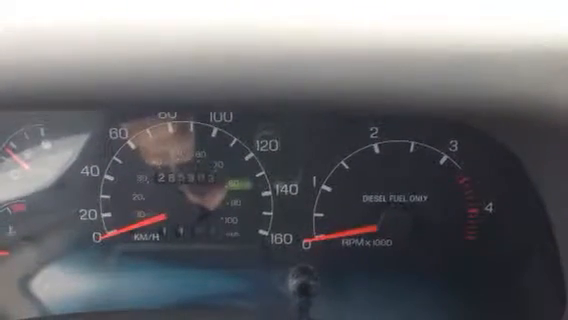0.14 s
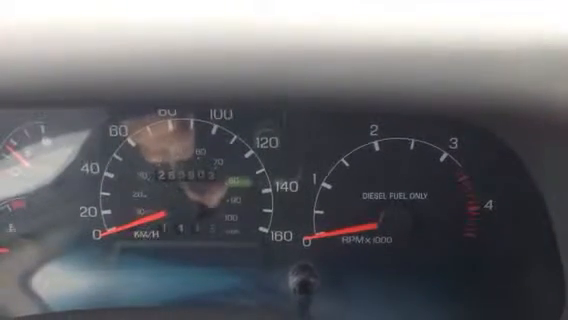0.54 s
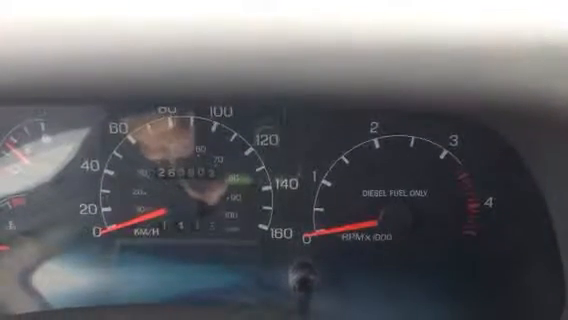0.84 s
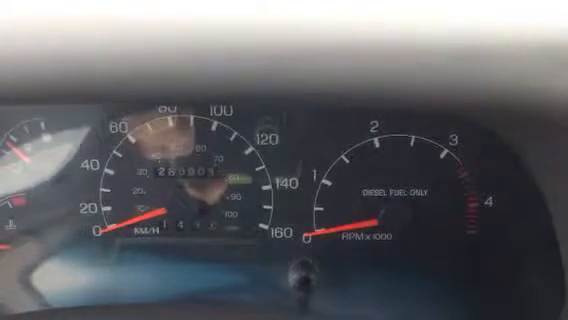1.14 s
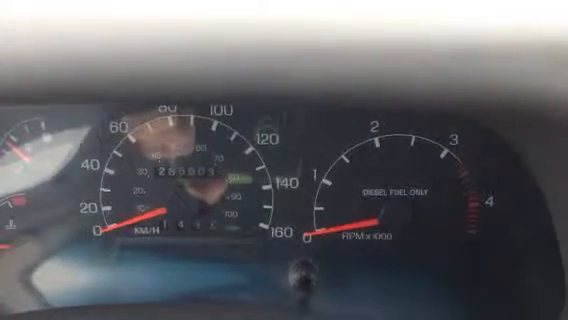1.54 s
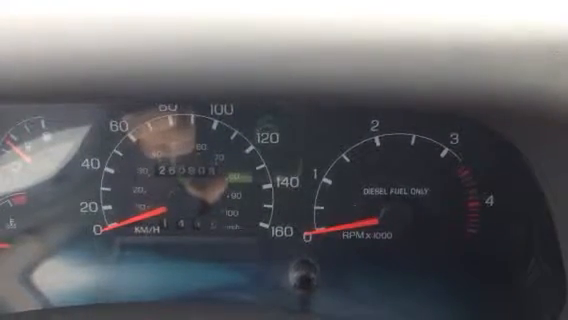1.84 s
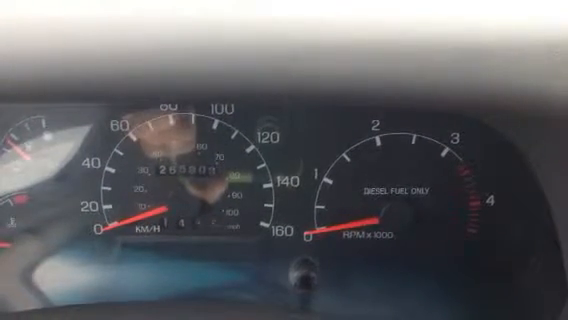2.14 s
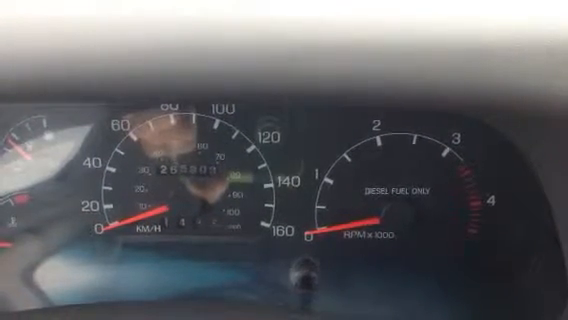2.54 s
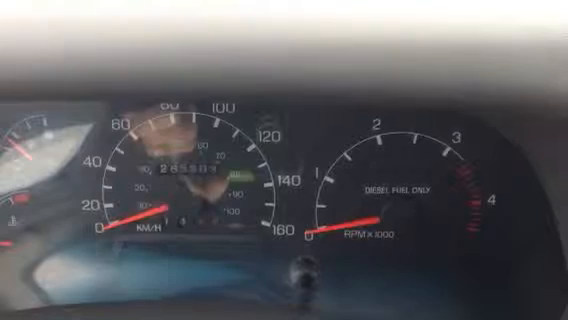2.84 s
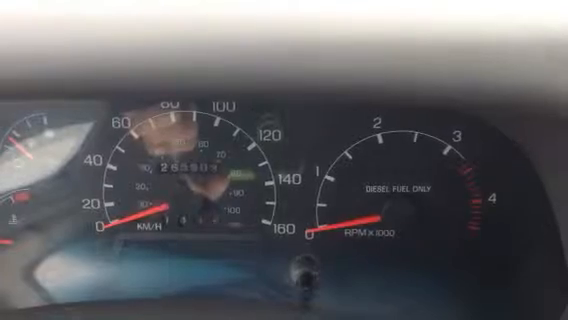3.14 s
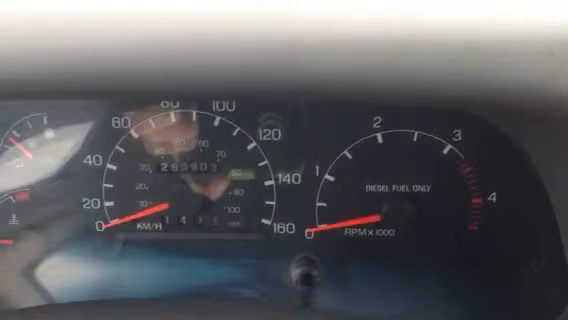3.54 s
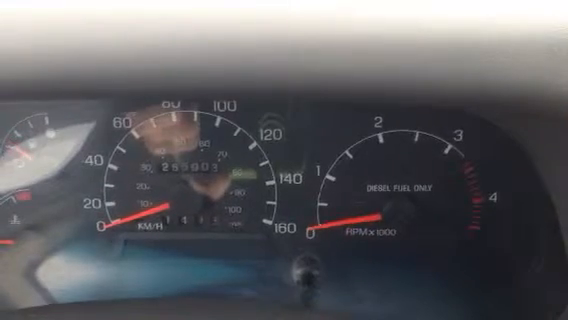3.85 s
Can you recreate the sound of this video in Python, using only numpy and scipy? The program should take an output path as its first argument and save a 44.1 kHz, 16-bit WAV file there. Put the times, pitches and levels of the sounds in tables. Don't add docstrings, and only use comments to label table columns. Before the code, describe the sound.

Starter motor of a parked diesel clunks in and grinds after sparse sharp ignition switch clicks.

```python
import sys
import numpy as np
from scipy import signal
from scipy.fft import rfft, irfft
from scipy.io import wavfile
from scipy.ndimage import uniform_filter1d

SR = 44100
rng = np.random.default_rng(int(sys.argv[2]) if len(sys.argv) > 2 else 0)


def nominal_scale(level):
    x = np.asarray(level, float) / 20
    return 10 ** x


def dump_mix(stems):
    frames = np.atleast_2d(stems).T
    limited = np.clip(frames, -1, 1)
    pcm = np.round(limited * 32767).astype(np.int16)
    wavfile.write(sys.argv[1], SR, pcm)


N = 176400


def colour(points, size=N):
    hz, db = np.array(points, float).T
    log_f = np.log(np.arange(size // 2 + 1) * SR / size + 1)
    gain = nominal_scale(np.interp(log_f, np.log(hz), db, left=-90))
    x = irfft(rfft(rng.standard_normal(size)) * gain, size)
    return x / x.std()


def ring(x, body):
    return sum(nominal_scale(db) * signal.lfilter(*signal.iirpeak(hz, hz / width, SR), x) for hz, width, db in body)


def walk(rate, size=N):
    k = int(SR / rate)
    x = np.repeat(rng.standard_normal(size // k + 1), k)
    x = uniform_filter1d(uniform_filter1d(x, k), k)[:size]
    return x / x.std()


def pushes(rows):
    width_s = 0.00059
    t = np.arange(N) / SR
    return sum(nominal_scale(db) * np.exp(-((t - s) / width_s) ** 2) for s, db in rows)


def contact(hits, body, tone, broad_db, grit_db, wet_db):
    cabin_t60_s, mode_grit, wander = .08, .55, .42
    first, size = int((hits[0][0] - .04) * SR), 20480
    t = (first + np.arange(size)) / SR
    env = 0
    for s, db, rise, t60 in hits:
        env = env + nominal_scale(db) * np.exp(np.where(t < s, (t - s) / rise, np.log(1000) * (s - t) / t60))

    modes = 0
    for hz, width, db in body:
        level = nominal_scale(db + mode_grit * grit_db * walk(200, size))
        pitch = hz + wander * width * walk(400, size)
        modes = modes + level * np.sin(2 * np.pi * np.cumsum(pitch) / SR)
    modes = modes / modes.std() * (env / env.max()) ** .35
    crack = nominal_scale(broad_db + grit_db / 2 * walk(500, size)) * colour(tone, size)

    fade = np.exp(-np.log(1e6) / cabin_t60_s / SR)
    tail = np.sqrt(signal.lfilter([1 - fade], [1, -fade], env ** 2))
    burst = (modes + crack) * env + nominal_scale(wet_db) * tail * colour(tone, size)
    return np.pad(burst, (first, N))[:N]


# f/Hz, density level/dB
HISS_TONE = [(350, -9.5), (600, -1.5), (831, -5.5), (926, -5.5), (1230, -9.5), (4400, -2.5), (7880, -5.5),
             (14100, -6.5), (15300, -7)]


def hiss():
    return nominal_scale(-67.5) * colour(HISS_TONE)


# f/Hz, rms level/dB
HUM_LINES = [(251.2, -68), (230, -76.5), (527, -87)]


def hum():
    t = np.arange(N) / SR
    lines = 0
    for hz, db in HUM_LINES:
        level = nominal_scale(db + 1.5 + 0.76 * walk(6.12))
        lines = lines + level * np.sin(2 * np.pi * hz * t + 0.2 * walk(2.2))
    return lines


# f/Hz, density level/dB
RUMBLE_TONE = [(25, -53), (55, -1.5), (95, -1), (140, -13.5), (185, 1), (225, -15.5), (380, -15.5),
               (700, -47)]


def rumble():
    level_db, swell_db, flicker_db = -55.5, 1.8, .8
    base, bumps = colour(RUMBLE_TONE), walk(41)
    total = 0
    for hz in 30 * 2. ** np.arange(6):
        edges = [hz / 2 ** .5, hz * 2 ** .5]
        octave = signal.sosfilt(signal.butter(2, edges, "band", fs=SR, output="sos"), base)
        total = total + nominal_scale(swell_db * bumps * min(100 / hz, 1) + flicker_db * walk(20)) * octave
    return nominal_scale(level_db) * total


# t/s, level/dB, rise/s, T60/s
SNAP_HITS = [
    (.0895, -48, .0005, .06),
    (.0954, -25, .0006, .022),
    (.0966, -30, .0004, .01),
    (.102, -41, .001, .045),
    (.112, -52, .002, .09),
]
# f/Hz, width/Hz, level/dB
SNAP_MODES = [(2500, 270, -0.5), (5700, 130, 5.5), (7800, 540, -12)]
# f/Hz, density level/dB
SNAP_CRACK = [(150, -6.5), (500, -4.5), (1000, -2.5), (2400, -2), (5700, -6), (8500, -10.5), (9800, -20),
              (15000, -33)]


def snap():
    return contact(SNAP_HITS, SNAP_MODES, SNAP_CRACK, -7.5, 1.3, -8.0)


# t/s, level/dB, rise/s, T60/s
CLOSE_HITS = [
    (.737, -60, .003, .03),
    (.7447, -34, .0003, .045),
    (.752, -44, .001, .045),
]
OPEN_HITS = [
    (.8105, -48.5, 0.00069, 0.042),
    (.8155, -42.5, 0.0015, 0.036),
    (.821, -41.5, 0.0013, 0.05),
    (.832, -54, .001, .05),
]
# f/Hz, width/Hz, level/dB
CLOSE_MODES = [(1100, 144, -13), (2823, 180, -5), (4520, 210, 2), (5600, 220, -0.5), (7080, 260, -3.5),
               (12070, 380, -9)]
OPEN_MODES = [(1130, 80, -4.5), (1610, 50, 0.5), (1937, 46, -6), (2470, 60, -9), (2750, 130, -3),
              (4760, 205, -2), (5250, 200, -5), (6000, 220, -8), (6770, 100, -9), (7150, 100, -12)]
# f/Hz, density level/dB
CLOSE_CRACK = [(600, -35), (1100, -5), (2800, -2), (3600, -4), (5000, -3.5), (8500, -7), (9500, -10),
               (15000, -14)]
OPEN_CRACK = [(600, -21.5), (1000, -3), (2700, -3), (3600, -13.5), (5000, -8), (7500, -17.5),
              (15000, -23.5)]


def relay():
    closing = contact(CLOSE_HITS, CLOSE_MODES, CLOSE_CRACK, -8.5, 1.8, -8)
    return closing + contact(OPEN_HITS, OPEN_MODES, OPEN_CRACK, -3, 1.5, -6)


# t/s, level/dB, rise/s, T60/s
TICK_HITS = [
    (3.2335, -49, 0.0012, 0.049),
    (3.243, -58.5, 0.0033, 0.12),
]
DETENT_HITS = [
    (3.2875, -38.5, 0.0019, 0.03),
    (3.294, -48, .001, 0.027),
    (3.303, -53, 0.0014, 0.038),
]
CLACK_HITS = [
    (3.3765, -37.5, 0.0026, 0.045),
    (3.381, -39, .001, 0.026),
    (3.386, -45, 0.0015, 0.028),
    (3.395, -45.5, 0.002, 0.028),
]
# f/Hz, width/Hz, level/dB
TICK_MODES = [(567, 50, -4.5), (2483, 89, -9), (4780, 310, -10), (6680, 77, -11)]
DETENT_MODES = [(984, 51, -5), (1190, 72, 2), (2170, 58, -17), (2450, 106, -8), (3420, 69, -9),
                (3890, 80, -3.5), (4650, 240, -6), (5200, 170, -8), (7600, 300, -12), (10800, 300, -11)]
CLACK_MODES = [(1220, 100, -3), (2684, 74, 2.5), (3270, 60, -8), (3690, 65, -10.5), (4200, 72, -9),
               (5600, 130, -11), (6140, 88, -13), (7500, 200, -10), (8360, 100, -13)]
# f/Hz, density level/dB
TICK_CRACK = [(400, -2), (1500, -9), (2500, -9.5), (7000, -15), (15000, -23)]
DETENT_CRACK = [(250, -8), (750, -6), (1100, -3), (2700, -3.5), (5000, -11), (8000, -17.5), (15000, -24)]
CLACK_CRACK = [(250, 2), (750, -11.5), (1200, -7), (2700, -3.5), (5000, -11.5), (8000, -12), (9500, -19),
               (15000, -26)]


def lock_barrel():
    ticks = contact(TICK_HITS, TICK_MODES, TICK_CRACK, -1.5, 1.8, -4)
    detents = contact(DETENT_HITS, DETENT_MODES, DETENT_CRACK, -4.5, 2.5, -5.5)
    return ticks + detents + contact(CLACK_HITS, CLACK_MODES, CLACK_CRACK, -6.5, 1.8, -6.5)


# t/s, level/dB, rise/s, T60/s
SCRAPE_HITS = [(3.316, -51.5, 0.0033, 0.055), (3.33, -50.5, 0.0061, 0.066), (3.346, -51, .005, 0.089),
               (3.416, -45, 0.0017, 0.032), (3.427, -44.5, 0.0028, 0.049), (3.443, -44.5, 0.0027, 0.025),
               (3.461, -42, 0.0023, 0.058), (3.479, -46.5, 0.0037, 0.048), (3.497, -59, .003, 0.028)]
# f/Hz, width/Hz, level/dB
SCRAPE_MODES = [(1010, 60, -9), (1170, 58, -2.5), (1700, 86, -14), (2140, 53, -3), (2480, 61, 1.5),
                (4700, 100, -9), (4910, 160, 1), (5380, 160, -5), (8310, 120, -13), (8800, 100, -19),
                (10500, 100, -11), (11100, 100, -10)]
# f/Hz, density level/dB
SCRAPE_FRICTION = [(150, 5), (700, -2.5), (2400, -4.5), (5000, -6.5), (6600, -15.5), (8500, -9.5),
                   (11000, -15), (15000, -27)]


def key_scrape():
    return contact(SCRAPE_HITS, SCRAPE_MODES, SCRAPE_FRICTION, -3, 3.5, -5.5)


# t/s, level/dB, rise/s, T60/s
JINGLE_HITS = [
    (3.618, -59.5, 0.00049, 0.082),
]
# f/Hz, width/Hz, level/dB
JINGLE_MODES = [(1340, 50, -7), (2440, 50, -5), (3490, 80, -4), (4110, 40, -2), (6850, 40, -1),
                (8940, 40, -6), (11300, 58, -1), (15000, 70, -5)]
# f/Hz, density level/dB
JINGLE_CRACK = [(900, -12), (1400, -3), (4000, -3), (7000, -1), (9000, -6), (11500, 2), (15000, -13.5)]


def key_ring():
    return contact(JINGLE_HITS, JINGLE_MODES, JINGLE_CRACK, 0.5, 2.8, -1.5)


# t/s, level/dB, f/Hz
COLUMN_THUDS = [(3.236, -51.5, 570), (3.236, -56.5, 150), (3.258, -59, 193), (3.288, -55, 520),
                (3.288, -53, 89), (3.329, -57.5, 110), (3.379, -50.5, 263), (3.381, -48, 423),
                (3.395, -52, 330), (3.414, -53.5, 206), (3.429, -56, 217), (3.465, -57, 412),
                (3.46, -54, 590), (3.631, -65.5, 562), (3.79, -50, 145), (3.847, -44, 95),
                (3.838, -41, 210), (3.898, -38, 400), (3.866, -38, 300), (3.882, -40, 200),
                (3.91, -39, 445), (3.933, -45, 105), (3.952, -44.5, 125), (3.975, -45, 208)]


def column():
    width_hz = 67
    total = 0
    for s, db, hz in COLUMN_THUDS:
        thud = ring(pushes([(s, db + 22)]), [(hz, width_hz, 0)])
        total = total + ring(thud, [(hz, 2 * width_hz, 0)])
    return total


# t/s, level/dB, rise/s, T60/s
SOLENOID_HITS = [
    (3.787, -69, 0.0021, .05),
    (3.8, -47.5, 0.0013, 0.043),
    (3.807, -34.5, 0.0043, 0.1),
]
# f/Hz, width/Hz, level/dB
SOLENOID_MODES = [(1450, 110, -5.5), (2480, 204, 2), (3420, 150, -3), (4150, 200, -10), (5500, 310, -10),
                  (12200, 260, -26), (13300, 300, -20)]
# f/Hz, density level/dB
SOLENOID_CRACK = [(150, -4.5), (1000, -8), (2500, 3), (4000, -9), (8000, -16.5), (15000, -23.5)]


def solenoid():
    return contact(SOLENOID_HITS, SOLENOID_MODES, SOLENOID_CRACK, 1.7, 1.0, -1)


def heave():
    start_s, hz, rise_s = 3.985, 62.6, 0.015
    t = np.arange(N) / SR - start_s
    return nominal_scale(-31.5) * np.clip(t / rise_s, 0, 1) * np.sin(2 * np.pi * hz * t)


# f/Hz, width/Hz, level/dB
PANEL_MODES = [(106, 8.9, 0.5), (170, 18, -11), (212.5, 22, 8), (300, 62, -10), (400, 100, 0), (454, 24, 4),
               (520, 43, -4)]


def panels(force):
    return ring(force, PANEL_MODES)


def engaged():
    start_s, rise_s = 3.81, 0.019
    return np.clip((np.arange(N) / SR - start_s) / rise_s, 0, 1)


def motor_grind():
    grind = panels(rng.standard_normal(N) * nominal_scale(1.0 * walk(60)))
    return engaged() * nominal_scale(-40) * grind / grind.std()


# t/s, level/dB, rise/s, T60/s
MESH_HITS = [(3.849, -34.5, 0.0056, 0.062), (3.864, -34, 0.003, 0.06), (3.879, -41.5, .004, .05),
             (3.896, -44, .002, .04), (3.911, -36, .002, 0.069), (3.924, -34.5, 0.002, 0.074),
             (3.942, -41.5, 0.003, 0.06), (3.96, -48, .003, .04), (3.975, -35.5, 0.002, 0.06),
             (3.99, -34, 0.004, .06), (3.998, -42, .002, .04)]
# f/Hz, width/Hz, level/dB
MESH_MODES = [(1220, 60, -6.5), (1453, 78, -1.5), (2190, 81, -5), (2416, 127, 3.5), (2840, 58, -9),
              (2983, 70, -1), (3180, 53, -12), (3420, 60, -2.5), (4100, 160, -9), (5510, 200, -14)]
# f/Hz, density level/dB
MESH_FRICTION = [(500, -25), (900, -11), (1500, -1.5), (2500, -1.5), (3500, -3), (5800, -16.5),
                 (7700, -14.5), (15000, -31)]


def gear_mesh():
    whine_top_hz, whine_db = 3900, -42
    whine = signal.lfilter(*signal.butter(4, whine_top_hz, fs=SR), colour(MESH_FRICTION))
    whine = whine * nominal_scale(whine_db + 2.2 * walk(150))
    return contact(MESH_HITS, MESH_MODES, MESH_FRICTION, -6, 4.1, -8.5) + engaged() * whine


# t/s, level/dB
TOOTH_KNOCKS = [(3.792, -51), (3.8285, -35), (3.8355, -28), (3.8433, -29), (3.851, -36), (3.877, -39),
                (3.8928, -32), (3.8978, -30), (3.9055, -30), (3.915, -36), (3.9545, -32), (3.9612, -25),
                (3.969, -27), (3.9745, -34), (3.983, -35)]


def tooth_knocks():
    case_hz, case_width_hz, panel_db = 383, 160, -1.5
    push = pushes(TOOTH_KNOCKS)
    case = ring(push, [(case_hz, case_width_hz, 0)])
    return nominal_scale(6.5) * (case + nominal_scale(panel_db) * panels(push))


def starter():
    return solenoid() + heave() + motor_grind() + gear_mesh() + tooth_knocks()


def scene():
    background = hiss() + hum() + rumble()
    key = lock_barrel() + key_scrape() + key_ring()
    return (background + snap() + relay() + key + column() + starter())[None]


def low_pass(x):
    return signal.sosfilt(signal.butter(12, 15470, fs=SR, output="sos"), x)


def record(dry):
    top_hz = 15330
    mix = signal.sosfilt(signal.ellip(10, .3, 60, top_hz, fs=SR, output="sos"), dry)
    return low_pass(mix)


dry = scene()
out = record(dry)
dump_mix(out)
```